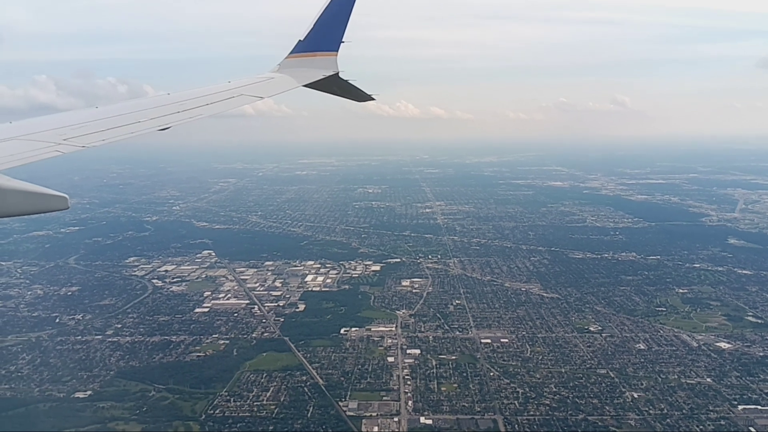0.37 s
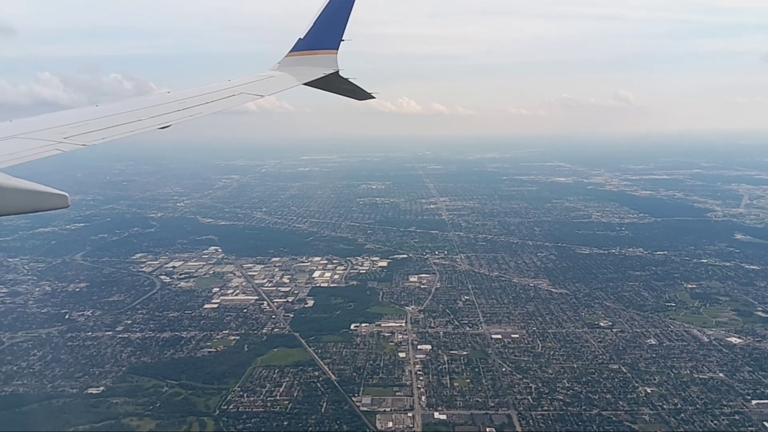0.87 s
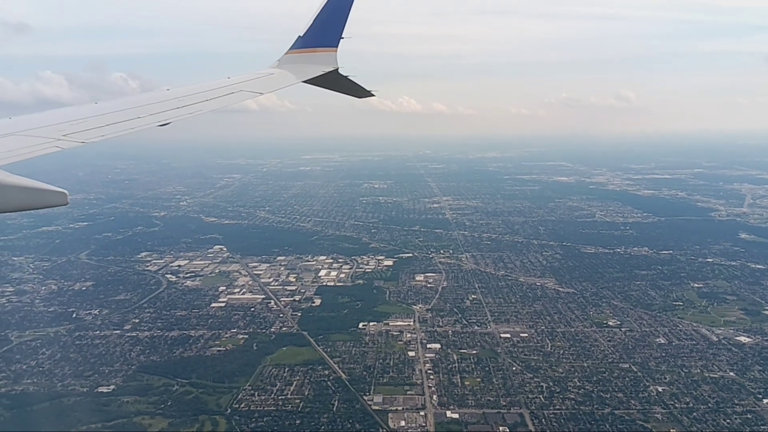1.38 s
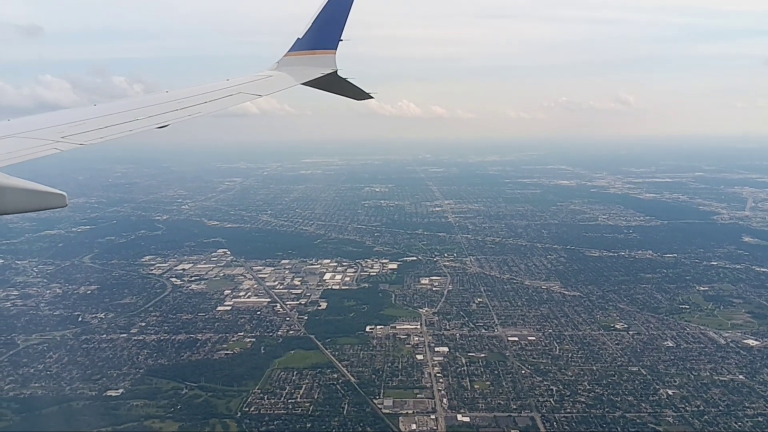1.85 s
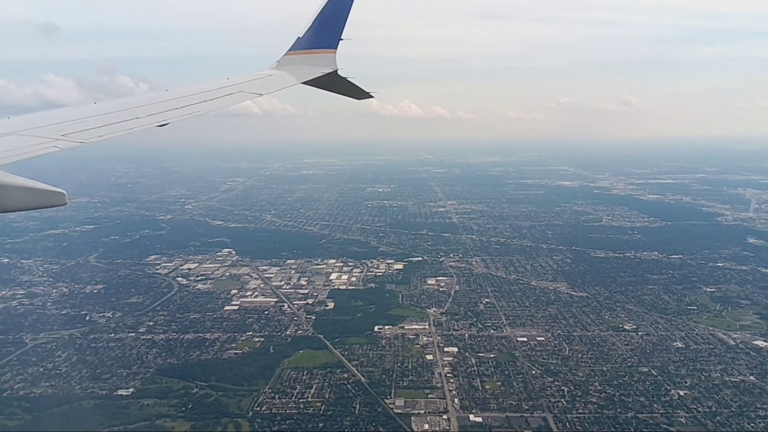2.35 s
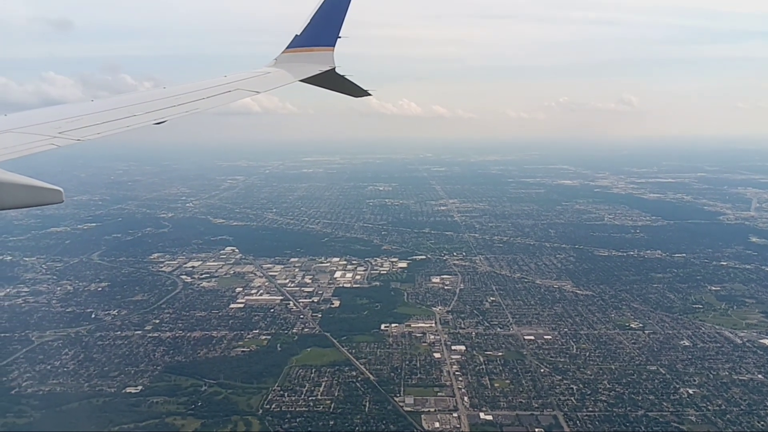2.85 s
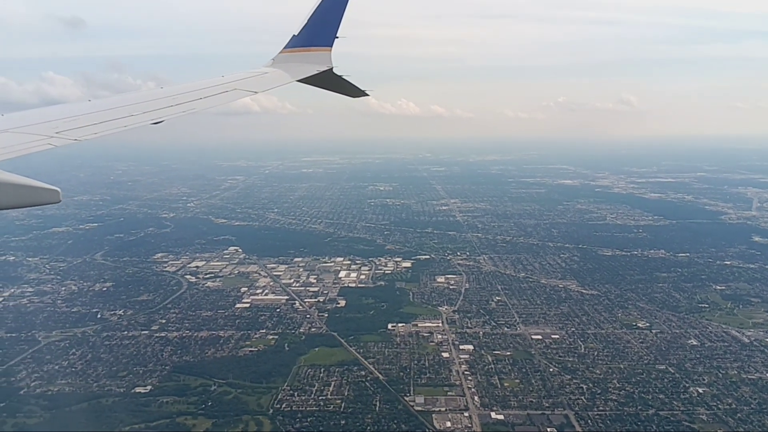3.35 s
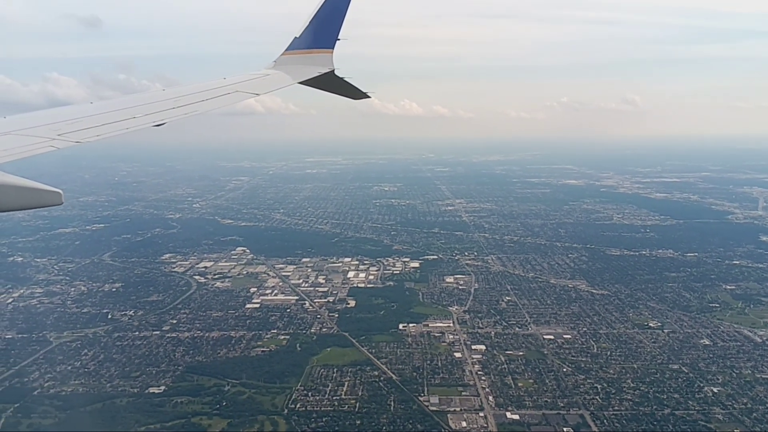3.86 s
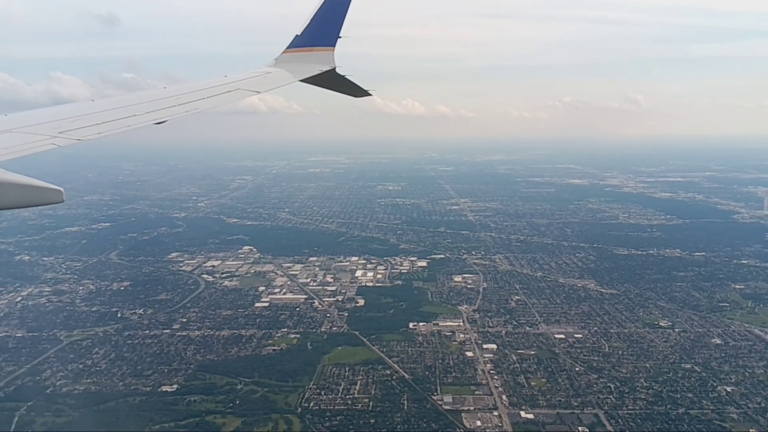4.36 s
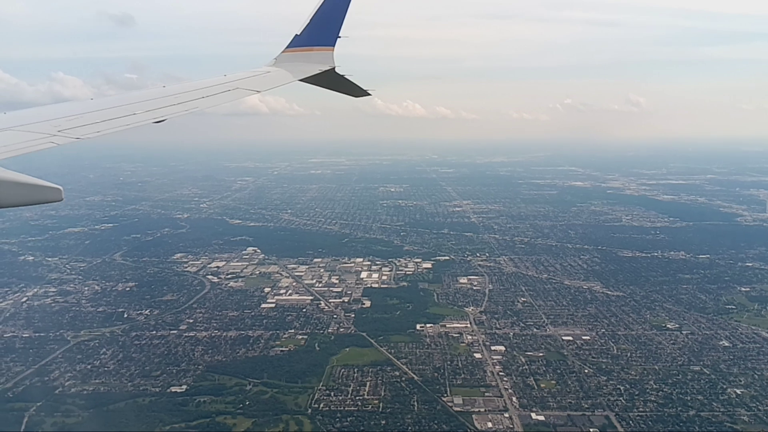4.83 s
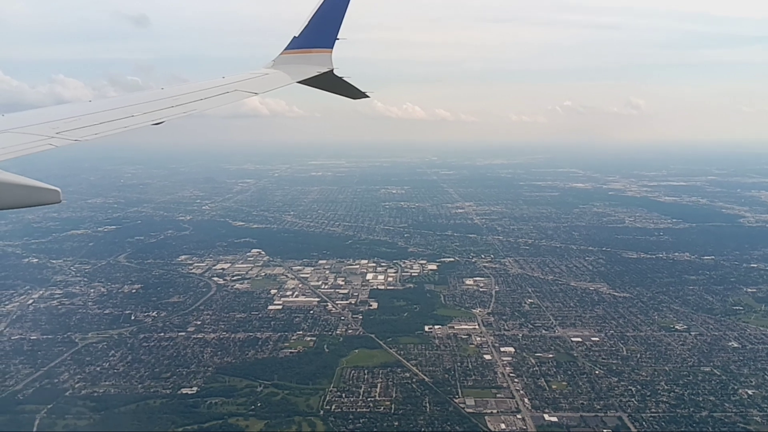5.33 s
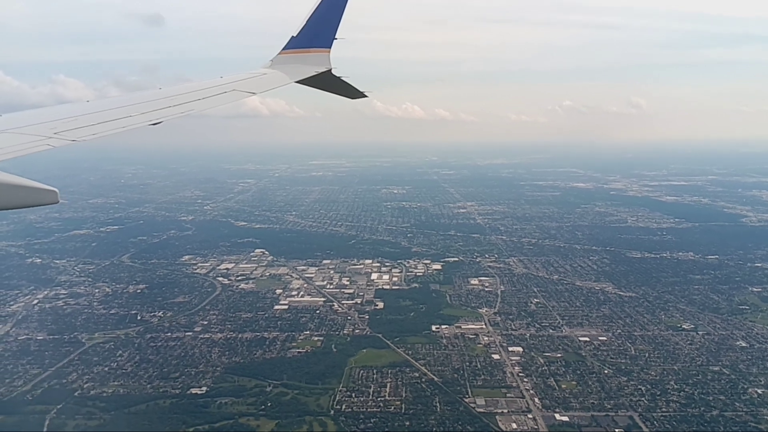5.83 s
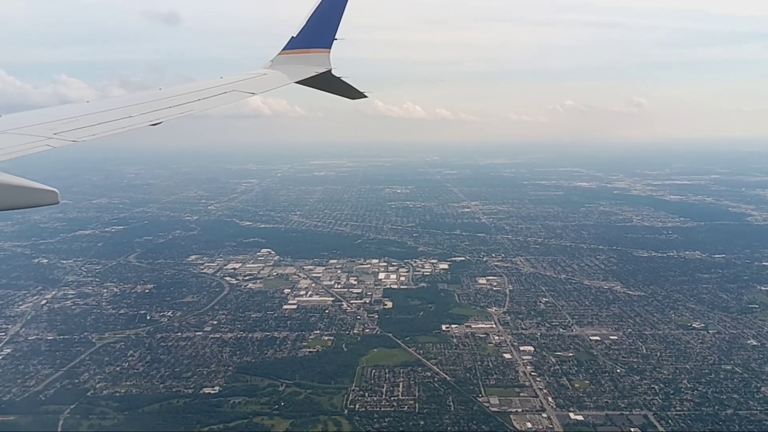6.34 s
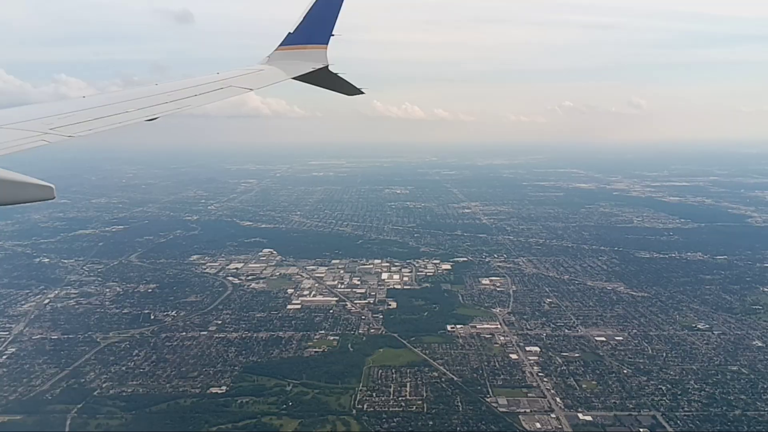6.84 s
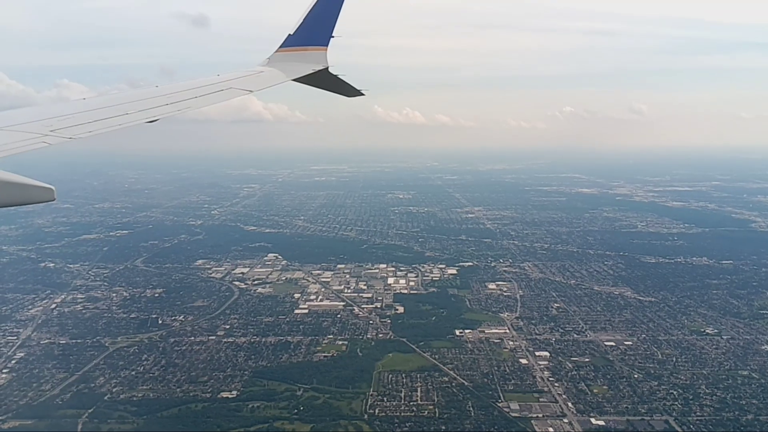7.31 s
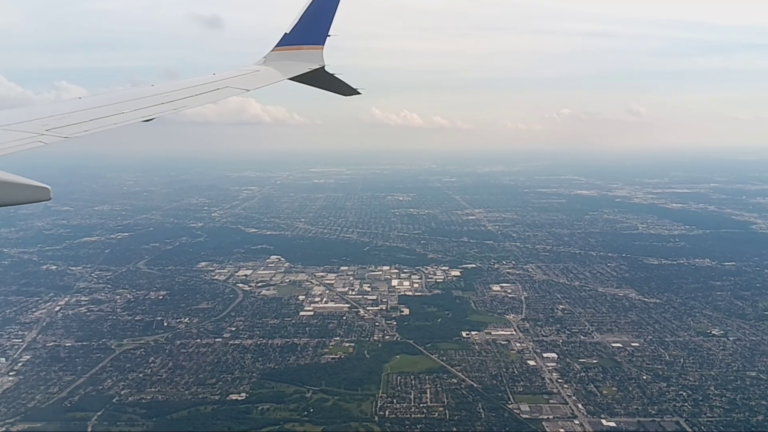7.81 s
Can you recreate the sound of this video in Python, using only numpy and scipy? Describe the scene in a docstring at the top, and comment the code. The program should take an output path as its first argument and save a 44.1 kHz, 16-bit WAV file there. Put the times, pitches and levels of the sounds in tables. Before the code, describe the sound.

From 0 to about 8 seconds, a loud, continuous low roar surrounds the listener at an airliner window in flight. Jet rumble and air rushing over the skin come muffled through the wall, thick in the bass with a boxy hum and only faint hiss above. The rumble dips very briefly near 0.2 seconds, stays fairly even, eases slightly around 3, swells gently near 7.2 and falls back at the end. Its upper texture flickers rapidly. Several thin, wavering engine whines lie deep in the noise. Tiny, sharp, high ticks occur irregularly throughout, very faint. An almost inaudible brush comes near 1.15 seconds, then a clearer short, ragged rustle close to the microphone at about 6.35. The close stereo pickup is louder and fuller on the left; the roar never stops.

```python
"""Airliner cabin in flight, at the window

Held at the window, two microphones hear air rushing over the skin and jet rumble through the wall: noise
coloured by cabin and trim resonances, its upper bands flickering. The engines add thin whines, made of
wavering sines. Faint ticks are clicks with a very short high ring; two brief rustles close to the recorder
are shaped noise. A look-ahead limiter holds the peaks of each side."""
import sys
import numpy as np
from scipy import signal
from scipy.fft import rfft, irfft, next_fast_len
from scipy.io import wavfile
from scipy.ndimage import uniform_filter1d, minimum_filter1d

SR = 44100
rng = np.random.default_rng(int(sys.argv[2]) if len(sys.argv) > 2 else 0)


def volts(x):
    """Linear amplitude factor 10**(x/20) for a level x in dB, scalar or array-like."""
    e = np.asarray(x, float) / 20
    return 10 ** e


def master(y):
    """Save y as 16-bit WAV."""
    cut = np.clip(np.atleast_2d(y).T, -1, 1)
    pcm = np.round(cut * 32767)  # scale
    wavfile.write(sys.argv[1], SR, pcm.astype(np.int16))


N = 361179      # length in samples

LEFT_LAG_S = 40 / 44100      # roar and whines reach the left microphone this much later


def columns(points, hz):
    """Reads each column of a table at the given frequencies, straight on a log frequency axis."""
    at_hz, *rest = np.transpose(points)
    return np.array([np.interp(np.log(hz), np.log(at_hz), column) for column in rest])


def drift(corner_hz, count):
    """Slow random wander of mean 0 and spread 1: noise at every 64th sample through two equal one-poles."""
    pole = np.exp(-128 * np.pi * corner_hz / SR)
    noise = rng.standard_normal((count, N // 64 + 1502))
    slow = signal.lfilter([1], [1, -2 * pole, pole * pole], noise)[:, 1500:]      # settled part only
    slow = (slow - slow.mean(axis=1, keepdims=True)) / slow.std(axis=1, keepdims=True)
    return np.array([np.interp(np.arange(N) / 64, np.arange(len(row)), row) for row in slow])


def roar(flicker_db, flicker_hz, top_share, shared, surge_db, surge_hz):
    """Noise with the wall's slope plus resonance humps; above the rumble, narrow bands flicker in level."""
    # roar through the wall without resonances, before flicker and swell:
    # freq_hz [Hz], left_db [dB per Hz], right_db [dB per Hz]
    wall = [(20, -59.5, -66), (33, -50, -56.5), (47.6, -37.5, -45), (118.7, -36, -41.5),
            (296, -36.5, -43.5), (381.3, -42.5, -52.5), (491, -53.5, -56.5), (695, -61, -65.5),
            (1073, -64, -72.5), (1235, -74, -83), (2150, -86, -99.5), (3150, -101, -106),
            (5200, -116, -121), (7000, -116, -121), (15800, -124, -113)]
    # left-right likeness once the lag is allowed for: freq_hz [Hz], likeness [-1 to 1]
    likeness = [(60, 1), (130, 0.97), (250, .88), (330, 0.98), (500, 0.66), (700, 0.48), (800, -0.015),
                (1100, -0.38), (1500, 0.17), (2600, 0.72), (4000, -0.069), (5600, 0.37), (8000, 0.)]
    # cabin, wall and trim resonances, before flicker and swell:
    # centre_hz [Hz], width_hz [Hz, for a single pass], left_db [dB per Hz], right_db [dB per Hz]
    resonances = [(133, 24, -28.5, -34.5), (792, 50, -58.5, -66), (153, 24, -34, -40), (265, 25, -40, -48),
                  (325, 40, -37, -43), (352, 30, -40, -46), (830, 60, -61, -68), (970, 110, -61, -71),
                  (1380, 120, -71, -78), (1540, 220, -68, -84), (1700, 200, -80, -81),
                  (1880, 200, -80, -85), (2250, 130, -80, -85), (2650, 130, -83, -95),
                  (2930, 110, -83, -100), (3420, 150, -93, -108), (3720, 100, -93, -108),
                  (4020, 200, -87, -112), (4380, 130, -90, -108), (4750, 130, -96, -115),
                  (5050, 150, -108, -108), (5610, 230, -94, -98), (6350, 200, -107, -110),
                  (6800, 200, -108, -116), (8300, 1200, -104, -118), (8800, 300, -101, -118),
                  (10000, 500, -112, -110), (11500, 900, -118, -104), (12400, 900, -116, -106),
                  (15300, 700, -122, -103)]
    # slow swell of the whole roar: time_s [s], gain_db [dB]
    swell = [(0, 0.8), (2.2, 1), (3, 0), (4.2, .5), (6.3, .2), (7.2, 1.7), (8.19, -0.5)]

    size = next_fast_len(N)
    hz = np.maximum(np.arange(size // 2 + 1) * SR / size, 1)
    power = volts(columns(wall, hz)) ** 2
    for centre_hz, width_hz, left_db, right_db in resonances:
        hump = 1 / (1 + (2 * (hz - centre_hz) / width_hz) ** 2) ** 2      # a resonance passed twice
        power = power + volts(np.array([[left_db], [right_db]])) ** 2 * hump

    first, second = rfft(rng.standard_normal((2, size)))
    alike = np.clip(columns(likeness, hz)[0], -1, 1)
    left = first * np.exp(-2j * np.pi * hz * LEFT_LAG_S)
    right = alike * first + np.sqrt(1 - alike ** 2) * second
    spectrum = np.sqrt(power * SR / 2) * [left, right]

    # 19 narrow bands, wider in Hz at the top; band 0 holds the rumble
    place = np.interp(np.log(hz), np.log([1200, 6000, 15000]), [0, 13, 18])
    together = drift(flicker_hz, count=1)[0]
    own = drift(flicker_hz, count=19)
    surges = drift(surge_hz, count=7)      # short swells, shared by groups of neighbouring bands
    t = np.arange(N) / SR
    # the rumble dips briefly once, by 4 dB around 0.17 s
    dip = volts(-4 * np.exp(-((t - 0.17) / 0.076) ** 2))
    out = 0
    for band in range(19):
        share = np.clip(1 - np.abs(place - band), 0, 1)      # the overlapping shares add up to one
        if band == 0:
            gain = dip
        else:
            depth_db = flicker_db * (top_share if band > 13 else 1)      # the top hiss is smoother
            flicker = depth_db * (shared * together + own[band])
            gain = volts(flicker + surge_db * surges[band // 3])
        out = out + irfft(spectrum * share, size)[:, :N] * gain
    swell_s, swell_db = np.transpose(swell)
    return out * volts(np.interp(t, swell_s, swell_db))


def whines(gain_db, waver_db, waver_hz, wander_turns):
    """Near sines that waver in level and phase as the many sound paths shift."""
    # whines on multiples of the shaft's turning rate, before gain and waver:
    # multiple [of the shaft rate], left_db [dB rms], right_db [dB rms]
    shaft_whines = [(26, -58, -72), (29, -75, -76), (30, -70, -66), (31, -74, -74), (35, -68, -76),
                    (36, -67, -73), (37, -73, -70), (42, -73, -83), (43, -76, -87), (65, -73, -102),
                    (66, -75, -100), (67, -78, -104), (70, -79, -108), (88, -88, -91), (89, -88, -88),
                    (141, -89, -105), (142, -85, -100)]
    # other steady whines, some in rows one shaft rate apart, before gain and waver:
    # freq_hz [Hz], left_db [dB rms], right_db [dB rms]
    other_whines = [(1279, -62, -76), (1443, -63, -67), (1580, -57, -74), (2630, -73, -85),
                    (2955, -74, -87), (3017, -82, -90), (3690, -82, -102), (3992, -67, -98),
                    (4293, -81, -101), (4398, -71, -88), (4522, -87, -96), (4735, -82, -108),
                    (5504, -86, -85), (5566, -74, -83), (5628, -73, -77), (5674, -84, -82),
                    (5736, -85, -86), (8220, -88, -101)]

    shaft_hz = 62.1
    lines = [(shaft_hz * multiple, left_db, right_db) for multiple, left_db, right_db in shaft_whines]
    lines = lines + other_whines
    t = np.arange(N) / SR - np.array([[LEFT_LAG_S], [0]])
    levels = drift(waver_hz, count=len(lines))
    phases = drift(waver_hz, count=len(lines))
    out = 0
    for (hz, left_db, right_db), level, phase in zip(lines, levels, phases):
        tone = np.sin(2 * np.pi * (hz * t + wander_turns * phase + rng.random()))
        level_db = np.array([[left_db], [right_db]]) + gain_db + waver_db * level
        out = out + np.sqrt(2) * volts(level_db) * tone      # root 2 turns rms into peak
    return out


def ticks(ring_hz, width_hz, ring_db, broad_db, right_db):
    """Each tick is a sharp click with a very short high ring, at the same instant on both sides."""
    # the clearest ticks, levels before the ring and broad gains: time_s [s], click_db [dB peak]
    clear_ticks = [(0.0881, -47), (1.7688, -46), (2.0697, -46.5), (2.2286, -42.5), (2.8293, -44.5),
                   (3.5088, -38.5), (3.9485, -43.5), (4.8482, -42.5), (5.3685, -50.5), (5.6685, -45),
                   (6.0487, -46), (6.3671, -48), (7.3282, -41.5), (7.6293, -46), (7.9687, -44),
                   (8.1092, -48)]

    clicks = np.full(N, 1e-18)
    # fainter ticks at random beats of a steady 20 ms clock, perhaps the recorder's working blocks
    beats_s = np.arange(.0085, N / SR, .02)
    faint = volts(-54.5 + 3.5 * rng.standard_normal(len(beats_s)))      # mean and spread in dB
    sounding = rng.random(len(beats_s)) < .06      # share of beats that tick
    clicks[(beats_s * SR).astype(int)] += faint * sounding
    clicks[[round(time_s * SR) for time_s, click_db in clear_ticks]] = volts(np.array(clear_ticks)[:, 1])

    radius = np.exp(-np.pi * width_hz / SR)
    angle = 2 * np.pi * ring_hz / SR
    ring = signal.lfilter([0, np.sin(angle)], [1, -2 * radius * np.cos(angle), radius * radius], clicks)
    both = volts(ring_db) * ring + volts(broad_db) * clicks
    return both * volts(np.array([[0], [right_db]]))


def rustles(rise_s, sag_s, tail_s, ragged_db):
    """Short ragged brushes of noise: quick rise, sagging body, soft tail; the lighter touch is brighter."""
    # rustles close to the recorder, levels on the left before the envelope and raggedness:
    # start_s [s], length_s [s], level_db [dB rms], tilt_db [dB per octave]
    touches = [(1.153, .012, -58, 4), (6.345, .02, -29.5, 0)]
    # colour of a rustle before the low cut and tilt: freq_hz [Hz], left_db [dB], right_db [dB]
    rustle_colour = [(700, -5, -8), (1300, 0, -4), (1900, -4, -12), (2500, -14, -21), (3200, -17, -21),
                     (4300, -19, -29), (5500, -22, -25), (7000, -24, -32), (9000, -24, -30),
                     (11000, -42, -26), (16000, -48, -29)]

    size = next_fast_len(N)
    hz = np.maximum(np.arange(size // 2 + 1) * SR / size, 1)
    low_cut = hz ** 2 / (hz ** 2 + 600 ** 2)
    common = rng.standard_normal(size)
    own = rng.standard_normal((2, size))
    spectrum = rfft(common + own) * volts(columns(rustle_colour, hz)) * low_cut
    out = 0
    for start_s, length_s, level_db, tilt_db in touches:
        noise = irfft(spectrum * volts(tilt_db * np.log2(hz / 1000)), size)[:, :N]
        t = np.arange(N) / SR - start_s
        rise = np.clip(t / rise_s, 0, 1)
        fall = np.exp(-np.maximum(t - length_s, 0) / tail_s - np.maximum(t, 0) / sag_s)
        out = out + volts(level_db) * rise * fall * noise / noise[0].std()
    return out * volts(ragged_db * drift(90, count=1))


def scene():
    """Cabin roar, engine whines, ticks and rustles, added at the two microphones."""
    cabin = roar(flicker_db=3.0, flicker_hz=32, top_share=0.91, shared=0.22, surge_db=1.5, surge_hz=4.5)
    engines = whines(gain_db=-2.0, waver_db=4.5, waver_hz=7.9, wander_turns=0.057)
    clicking = ticks(ring_hz=12600, width_hz=830, ring_db=1.5, broad_db=-1.5, right_db=-4.0)
    brushes = rustles(rise_s=.003, sag_s=.03, tail_s=0.01, ragged_db=1.7)
    return cabin + engines + clicking + brushes


def top_cut(x):
    """Nothing passes above the cut-off."""
    return signal.sosfilt(signal.butter(12, 15820, fs=SR, output="sos"), x)


def record(dry):
    """A fast look-ahead limiter turns each side down smoothly around its own peaks."""
    needed = np.minimum(1, .99 / np.maximum(np.abs(dry), 1e-9))      # ceiling at .99 of full scale
    gain = minimum_filter1d(needed, size=151, axis=1)
    for _ in range(3):      # three running means make a smooth dip
        gain = uniform_filter1d(gain, size=51, axis=1)
    return top_cut(dry * gain)


dry = scene()
out = record(dry)
master(out)
```